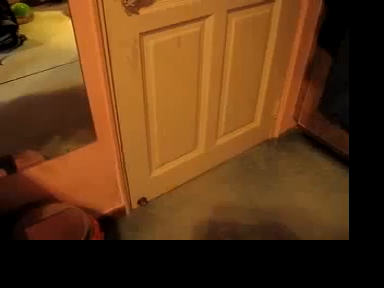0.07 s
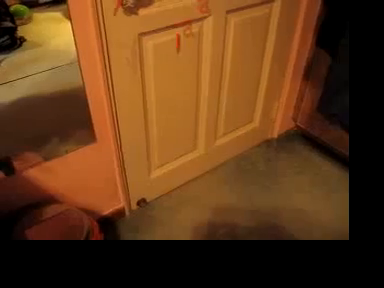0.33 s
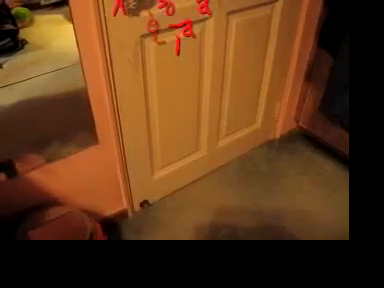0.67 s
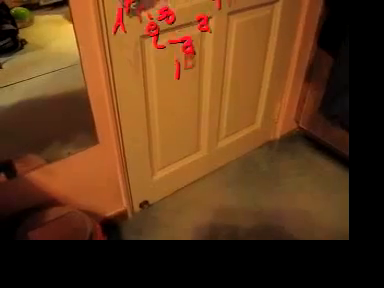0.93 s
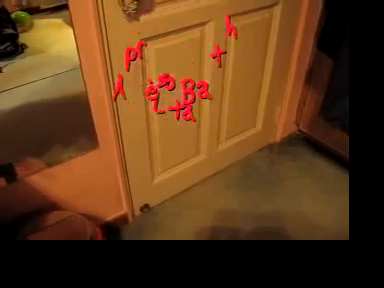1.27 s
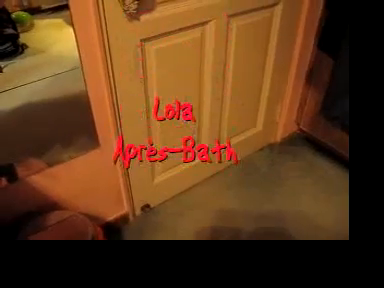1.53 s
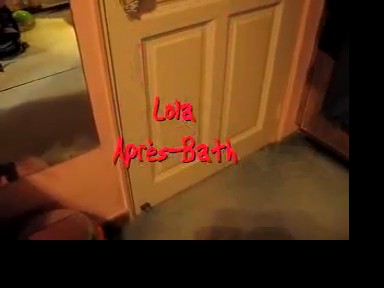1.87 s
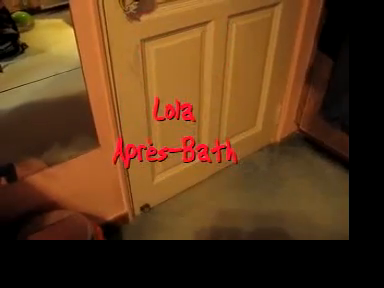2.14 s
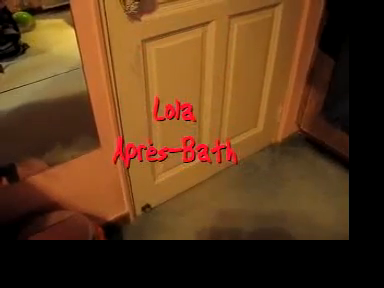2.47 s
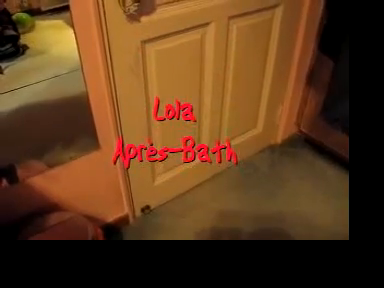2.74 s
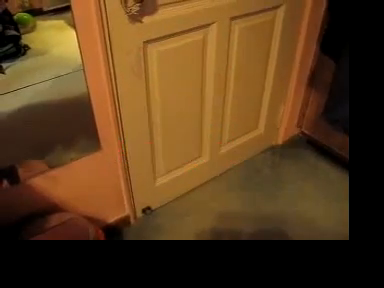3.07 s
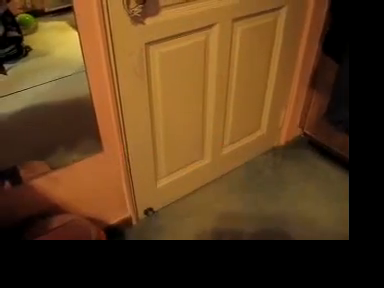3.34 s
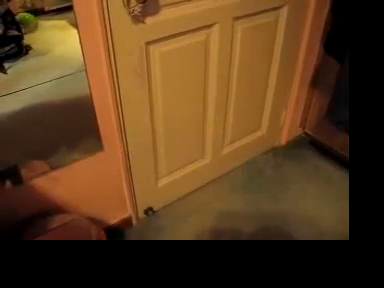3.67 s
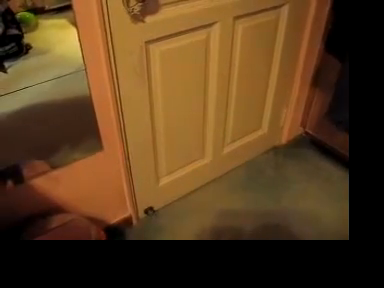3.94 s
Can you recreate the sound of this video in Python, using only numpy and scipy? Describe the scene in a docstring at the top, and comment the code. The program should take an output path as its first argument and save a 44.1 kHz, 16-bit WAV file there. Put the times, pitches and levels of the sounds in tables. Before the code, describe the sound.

An animal's claws scratch on a hard floor in a small room, over quiet, gritty, sputtering hiss. One tick comes at about 0.6 seconds. From 1.9 seconds, ticks, skids and tiny squeaks grow busier, with paw scuffs and soft thuds, and a knock near 2.8. Everything gets louder at 3 seconds. Something hollow is bumped and booms around 3.4, and the last scratches end by 3.7.

```python
"""An animal, probably a dog, scrabbles about on a hard floor in a small room, more and more busily.
Its claws tick, skid and squeak, its paws scuff, thud and knock, and it bumps something hollow that
booms; a motor hums faintly. A coarse, low-rate recorder turns the quiet room into a gritty sputter,
and the level steps up near the end."""
import sys
import numpy as np
from scipy import signal
from scipy.fft import rfft, irfft
from scipy.io import wavfile
from scipy.ndimage import uniform_filter1d

SR = 44100
rng = np.random.default_rng(int(sys.argv[2]) if len(sys.argv) > 2 else 0)


def transcribe(u):
    """Save the signal u as a 16-bit wav file named by the first command-line argument.

    u: samples, shape (n,) or (channels, n), limited to [-1, 1]; the rate is SR.
    q: integer samples, one column per channel.
    """
    v = np.clip(np.atleast_2d(u).T, -1, 1)
    q = np.round(v * 32767).astype(np.int16)
    wavfile.write(sys.argv[1], SR, q)


N = 176400
TIME = np.arange(N) / SR
TOP_HZ = 5572  # upper edge of the scratching and of the recorder's band
CLAW_ATTACK_S = 0.001

# claws striking and skidding: t/s, length/s, mid level/dB, lows re mid/dB, highs re mid/dB,
# squeak f/Hz, squeak level/dB
CLAWS = [(0.634, 0.003, -53.5, -18, -10, 1980, -53.5), (0.633, 0.0015, -57.5, -8, 0.5, 3720, -52),
         (1.858, 0.005, -51.5, -19, -2.5, 2990, -56.0), (1.868, 0.005, -52.5, -14, 4.0, 4200, -56.5),
         (1.924, 0.014, -52, -12.5, 4, 3000, -57), (1.999, 0.01, -48, -9, 5, 3376, -50.5),
         (2.012, 0.015, -46.5, -7, -1, 3220, -47), (2.18, 0.0063, -47, -3, 6, 3920, -49),
         (2.188, 0.0072, -46.5, -8, 0.5, 2790, -49), (2.209, 0.004, -49, -21, 2.5, 2390, -54.5),
         (2.337, 0.011, -50, -13, -6.5, 2205, -56.0), (2.352, 0.005, -56, -19.5, 3, 3860, -55.5),
         (2.361, 0.007, -50, -10, 3.0, 3850, -49.5), (2.382, 0.004, -53, -19, 0, 3290.0, -60),
         (2.396, 0.0074, -57, 3.5, 5, 4140, -58.5), (2.414, 0.011, -51.5, -6, 4, 3860, -54.5),
         (2.604, 0.0058, -42.5, -9.5, 1, 3025, -45), (2.63, 0.0077, -49, -6.5, 0, 2280.0, -53),
         (2.671, 0.0077, -50.5, -4, -3, 2770, -55.5), (2.678, 0.0048, -57.5, 6, 3, 3550, -57.0),
         (2.704, 0.0024, -48, -15, -2.5, 2275, -52.0), (2.797, 0.0051, -47.5, -17.5, 2.5, 2360, -53.5),
         (2.843, 0.015, -42, -2, -9, 1285, -42.5), (2.867, 0.0042, -46.5, -3, -1, 2770, -51.5),
         (2.893, 0.0082, -40.5, -10.5, 3.0, 3970, -45), (2.927, 0.0043, -44.5, -7.5, -1, 2285, -51),
         (3.029, 0.0076, -41, -3.5, -2, 3010, -46), (3.088, 0.0059, -47.5, -9.5, -4.5, 2350, -58),
         (3.117, 0.0096, -44.5, -2, -2, 2054, -46.5), (3.179, 0.0067, -54.5, -6.5, -6.5, 2930, -58.5),
         (3.209, 0.01, -51, -17.0, 4.5, 2770, -54.0), (3.293, 0.0039, -58.5, -7, 6.5, 3230, -62),
         (3.311, 0.0083, -61.5, -6, -1, 4400, -62.5), (3.335, 0.008, -60, -11, 2.5, 3760, -60.5),
         (3.35, 0.0052, -53, 3, -6.5, 1540, -59), (3.365, 0.0059, -42.5, -4, -2.5, 2035, -52),
         (3.38, 0.0061, -42, -2.5, 0.5, 2085, -48), (3.387, 0.011, -51, 3.5, -0.5, 2110, -52),
         (3.404, 0.011, -46, -13, -4, 2935, -51.5), (3.506, 0.006, -55.5, -18, 3, 2170, -60.5),
         (3.523, 0.0061, -48.5, -2, 1, 3336, -39.5), (3.523, 0.0083, -42, -18, -7, 2766, -39),
         (3.531, 0.008, -45.5, -11, -8.5, 2300, -44), (3.627, 0.0046, -48, -10.0, -4.5, 2045, -56)]


def from_db(db):
    """Decibels to gain."""
    return 10 ** (np.asarray(db) / 20)


def unit_rms(x):
    """Scale to rms 1."""
    return x / np.sqrt(np.mean(x ** 2) + 1e-20)


def band(x, low_hz, high_hz):
    """Causal band-pass."""
    return signal.sosfilt(signal.butter(2, [low_hz, high_hz], "band", fs=SR, output="sos"), x + 1e-18)


def resonate(x, hz, width_hz):
    """One resonance with unity gain at its peak."""
    r = np.exp(-np.pi * width_hz / SR)
    feedback = [1, -2 * r * np.cos(2 * np.pi * hz / SR), r * r]
    return signal.lfilter(np.array([1, 0, -1]) * (1 - r * r) / 2, feedback, x + 1e-18)


def envelope(start, length, attack_s, release_s):
    """Linear attack, hold, exponential release: returns the slice it covers and its shape."""
    part = slice(int(start * SR), int((start + length + 10 * release_s) * SR))
    age = TIME[part] - start
    return part, np.clip(age / attack_s, 0, 1) * np.exp(-np.maximum(age - length, 0) / release_s)


def room_tone():
    """A dull, steady bed of air."""
    # spectrum of the air: f/Hz, relative density/dB
    spectrum = [(20, -8.5), (45, -1.5), (100, 0.5), (200, -3.5), (400, -7), (800, -7.5), (1600, -17),
                (3000, -18), (5500, -26.5)]
    hz, db = np.transpose(spectrum)
    bin_hz = np.maximum(np.arange(N // 2 + 1) * SR / N, 1)
    colour = from_db(np.interp(np.log(bin_hz), np.log(hz), db))
    air = irfft(rfft(rng.standard_normal(N)) * colour, N)
    return from_db(-62) * unit_rms(air)


def motor_hum(hz=48.6):
    """A motor hums on one faint, low sine."""
    return from_db(-67.5) * unit_rms(np.sin(2 * np.pi * hz * TIME))


def friction(contacts, slips_per_s, attack_s, release_s, spread_db, even_s):
    """Tiny slips of uneven size under each contact's envelope, in three bands weighted by the contact."""
    sizes = from_db(spread_db * np.minimum(rng.exponential(1, N), 4)) * rng.choice([-1, 1], N)
    slips = sizes * (rng.random(N) < slips_per_s / SR)
    power = np.zeros((3, N))
    for start, length, db, low_db, high_db, *_ in contacts:
        part, shape = envelope(start, length, attack_s, release_s)
        power[:, part] += (from_db([[db + low_db], [db], [db + high_db]]) * shape) ** 2
    edges_hz, out = [560, 1600, 3200, TOP_HZ], 0
    for k in range(3):
        grains = band(slips, edges_hz[k], edges_hz[k + 1])
        local_power = np.abs(uniform_filter1d(grains ** 2, int(even_s * SR) + 1))
        levelled = grains / np.sqrt(local_power + 1e-3)
        rounded = 3 * np.tanh(levelled / 3)  # soft-clip the biggest slips
        out += (-1) ** k * rounded * np.sqrt(power[k])  # mid band in opposite polarity
    return out


def scuffs():
    """Paws and coat rub the floor in soft-edged, grainy strokes."""
    # rubs: t/s, length/s, mid level/dB, lows re mid/dB, highs re mid/dB
    rubs = [(0.065, 0.034, -61.5, -7.5, -17), (2.13, 0.014, -58, 0.5, 8), (2.152, 0.046, -61, 10, -15),
            (2.196, 0.027, -54, -1.5, -1.5), (2.428, 0.02, -53, 6, -5.5), (2.455, 0.022, -57, -5.5, 3),
            (2.612, 0.061, -54.5, -3, 2), (2.675, 0.055, -55, -2, 3), (2.742, 0.015, -54, -2, 3),
            (2.78, 0.089, -55.5, -14.5, -8), (2.855, 0.066, -51.5, -3, -14.5),
            (2.903, 0.033, -51.5, -13.5, 1), (3.04, 0.019, -59.5, 8.5, 3.5),
            (3.065, 0.042, -56.5, -4.5, -12), (3.128, 0.045, -58, -0.5, -0.5), (3.185, 0.028, -58, -0.5, 2),
            (3.225, 0.035, -64, -6, 0.5), (3.336, 0.038, -58, -1.5, 2.5), (3.412, 0.02, -60, -12, 3.5),
            (3.517, 0.022, -47.5, -4.5, -2.5), (3.652, 0.023, -59, 3, 0)]
    return friction(rubs, slips_per_s=2000, attack_s=0.0046, release_s=0.008, spread_db=3, even_s=0.01)


def floor_colour(x):
    """The scratched floor adds its resonances to the dry friction."""
    # floor resonances: f/Hz, width/Hz, level/dB
    modes = [(781, 79, -10.5), (1009, 35, -7.5), (1215, 100, -6), (1559, 70, -12), (2014, 55, -2.5),
             (2287, 80, -1.5), (2468, 60, -7), (2750, 70, -3), (3304, 90, -3.5), (3797, 40, -0.5)]
    return from_db(-2) * x + sum(from_db(db) * resonate(x, hz, width) for hz, width, db in modes)


def reflections(x, t60_s):
    """Dense echoes die away: a noise tail of unit energy after a 2 ms pre-delay."""
    age = TIME[:SR]
    tail = rng.standard_normal(SR) * from_db(-60 * age / t60_s) * (age > 0.002)
    return signal.fftconvolve(x, tail / np.sqrt(np.sum(tail ** 2)))[:N]


def claw_ticks():
    """Claws strike and skid in short, sharp bursts of dense slips."""
    return friction(CLAWS, slips_per_s=3200, attack_s=CLAW_ATTACK_S, release_s=0.0027,
                    spread_db=1.5, even_s=0.0072)


def claw_squeaks():
    """Each skidding claw squeaks briefly: a tone that wavers fast around a pitch of its own."""
    out = np.zeros(N)
    for start, length, *_, hz, db in CLAWS:
        narrow_noise = resonate(rng.standard_normal(8192), hz, width_hz=200)
        tone = unit_rms(np.cos(np.angle(signal.hilbert(narrow_noise))))  # phase only: even strength
        part, shape = envelope(start, length, CLAW_ATTACK_S, release_s=0.0028)
        out[part] += from_db(db) * tone[:len(shape)] * shape
    return out


def paw_thuds(attack_s=0.0046):
    """Each landing paw sets off a short, dull rumble."""
    # soft footfalls: t/s, level/dB
    footfalls = [(2.184, -50.5), (2.419, -58.5), (2.699, -59), (2.904, -52), (3.036, -53.5), (3.091, -51),
                 (3.134, -55), (3.205, -56), (3.361, -52.5), (3.405, -49.5)]
    weight = np.zeros(N)
    for start, db in footfalls:
        part, shape = envelope(start, attack_s, attack_s, release_s=0.045)
        weight[part] += from_db(db) * shape
    return weight * unit_rms(band(rng.standard_normal(N), low_hz=40.2, high_hz=120.3))


def struck(blows, modes):
    """Each blow rings a body's modes as decaying sines."""
    age, out = TIME[:SR], np.zeros(N + SR)
    ring = sum(from_db(db - 60 * age / t60) * np.sin(2 * np.pi * hz * age) for hz, db, t60 in modes)
    for start, db in blows:
        onset = int(start * SR)
        out[onset:onset + SR] += from_db(db) * ring
    return out[:N]


def paw_knocks():
    """A few paws land hard enough to knock, with a short midrange ring."""
    # hard landings: t/s, level/dB
    landings = [(2.847, -49), (3.042, -66), (3.09, -54.5)]
    # ring of a knock: f/Hz, level/dB, t60/s
    modes = [(347.5, 1, .3), (665, -2, 0.18), (769, -4.5, 0.13)]
    return struck(landings, modes)


def hollow_booms():
    """The animal bumps something hollow, and its low modes ring on."""
    # bumps: t/s, level/dB
    bumps = [(3.115, -61), (3.377, -48.5), (3.412, -44.5), (3.62, -59.5)]
    # modes of the hollow body: f/Hz, level/dB, t60/s
    modes = [(88.27, -2.5, 0.98), (115.5, -9, 0.58), (182.3, -2, .42), (207.3, -5.5, .25), (260, -11, .45),
             (341.4, -16.5, 0.5)]
    return struck(bumps, modes)


def scene():
    """The animal over the quiet bed, in mono; only the scratching feeds the room's echoes."""
    bed = room_tone() + motor_hum()
    scratching = floor_colour(from_db(0.5) * (claw_ticks() + scuffs())) + from_db(-2.5) * claw_squeaks()
    early = from_db(-13.5) * reflections(scratching, t60_s=0.04)
    late = from_db(-12) * reflections(scratching, t60_s=0.42)
    return (bed + scratching + early + late + paw_thuds() + paw_knocks() + hollow_booms())[None]


def record(dry):
    """A low-rate recorder crushes the sound to coarse steps; the level jumps near the end."""
    decimation, step, bias_steps = 4, 0.00305, 0.37
    silent_until_s, louder_at_s, louder_db = 0.041, 3.039, 8.8
    low_rate = signal.resample_poly(dry, 1, decimation, axis=1)
    crushed = step * np.round(low_rate / step - bias_steps)  # quiet air trips a step in fits: sputter
    pulses = np.zeros_like(dry)
    pulses[:, ::decimation] = decimation * crushed
    pulses *= (TIME > silent_until_s) * from_db(louder_db * (TIME > louder_at_s))
    smoothing = signal.firwin(141, TOP_HZ, window=("kaiser", 8), fs=SR)
    smooth = signal.fftconvolve(pulses, smoothing[None], "same")
    # faint fizz rides the waveform's slope and spills above the band
    fizz = from_db(-31) * decimation * np.gradient(smooth, axis=1) * rng.standard_normal(N)
    high_cut = signal.cheby2(12, 70, 17000, fs=SR, output="sos")
    return signal.sosfilt(high_cut, smooth + fizz)


dry = scene()
out = record(dry)
transcribe(out)
```